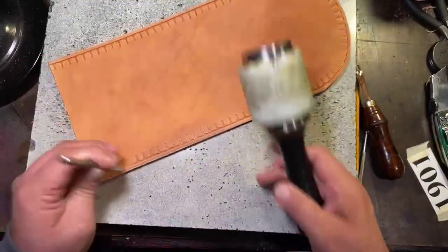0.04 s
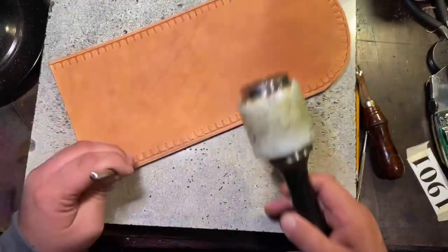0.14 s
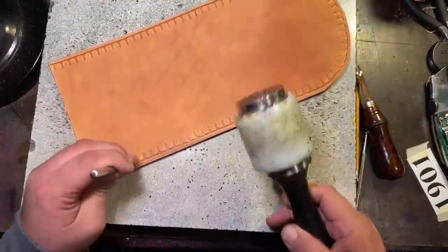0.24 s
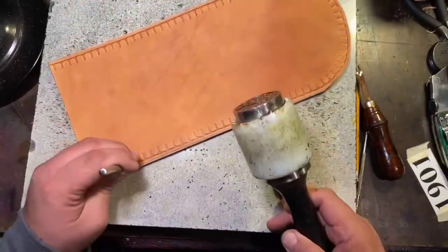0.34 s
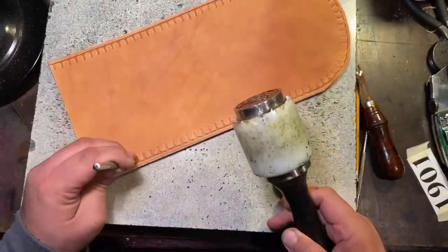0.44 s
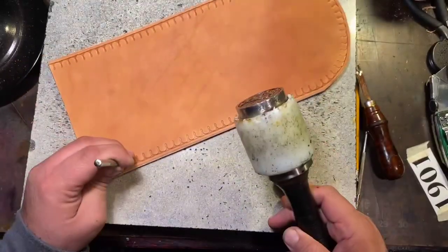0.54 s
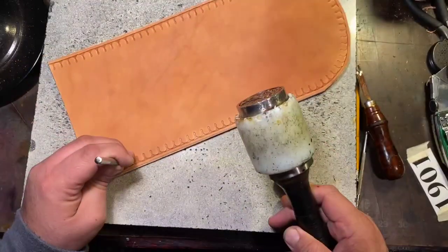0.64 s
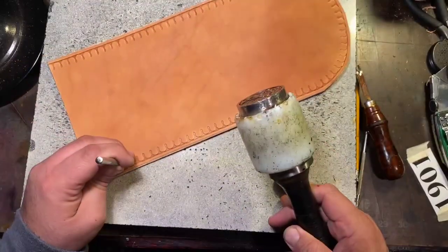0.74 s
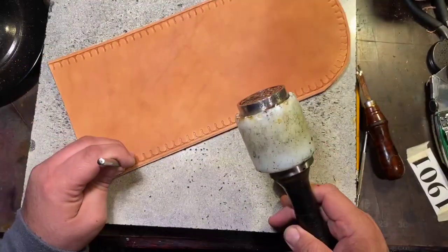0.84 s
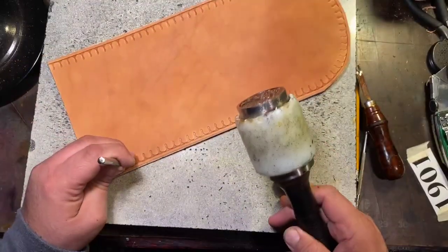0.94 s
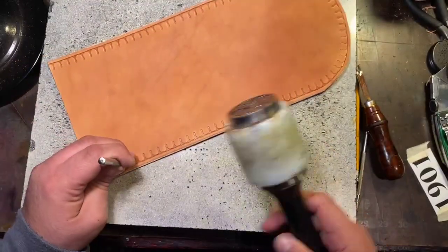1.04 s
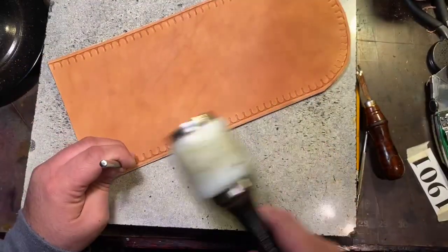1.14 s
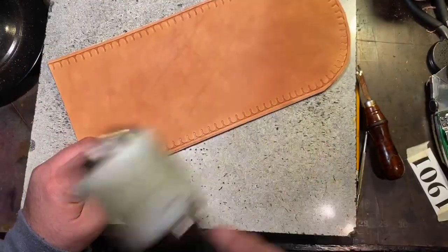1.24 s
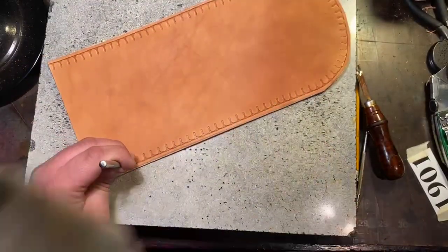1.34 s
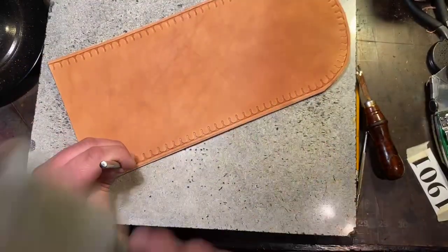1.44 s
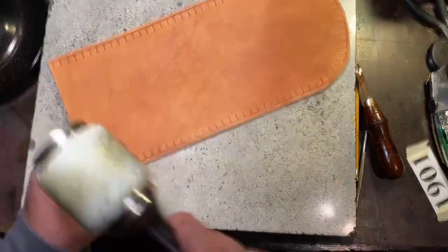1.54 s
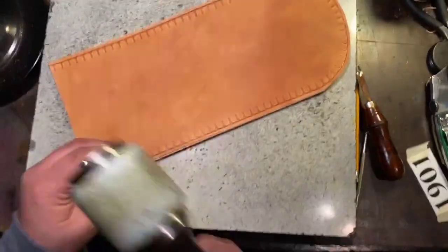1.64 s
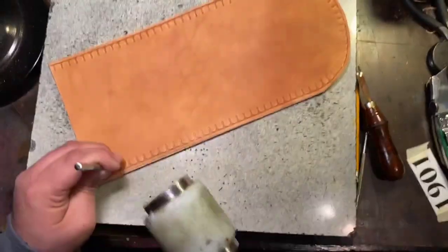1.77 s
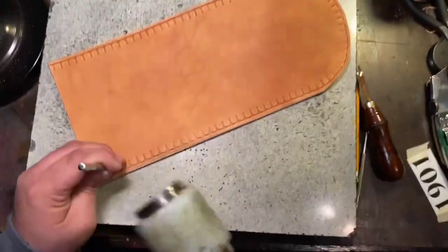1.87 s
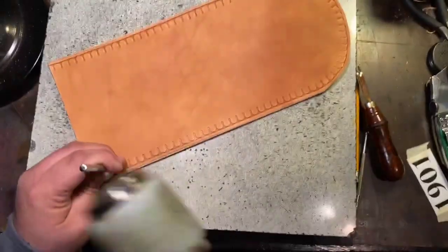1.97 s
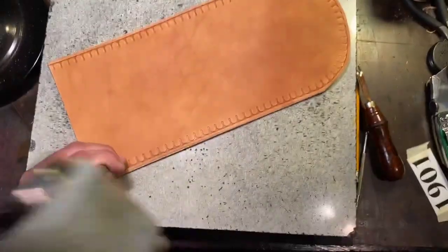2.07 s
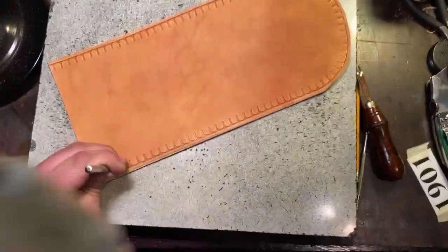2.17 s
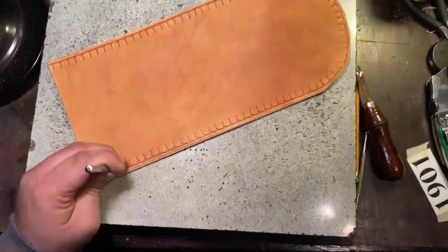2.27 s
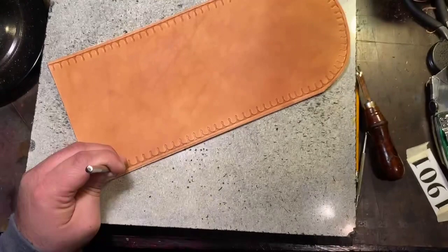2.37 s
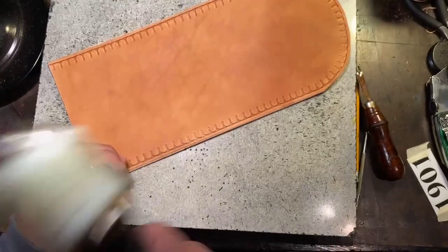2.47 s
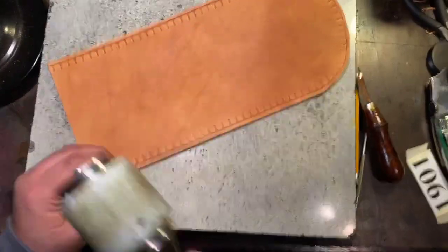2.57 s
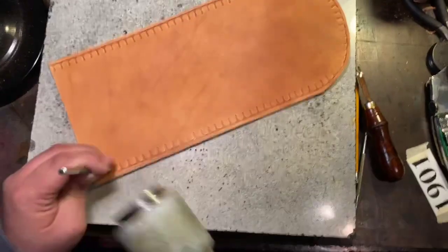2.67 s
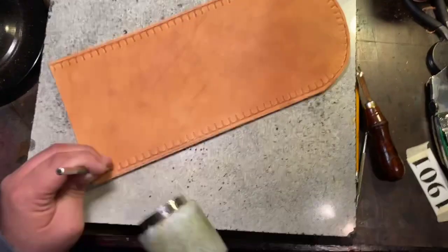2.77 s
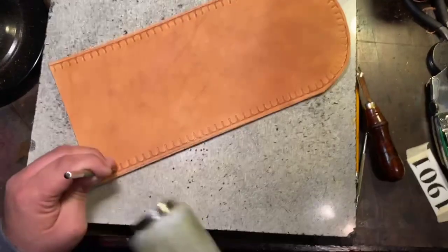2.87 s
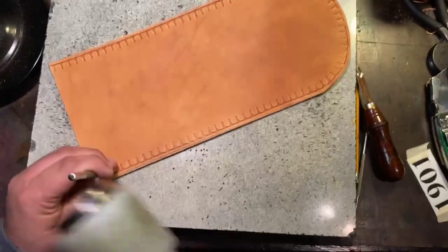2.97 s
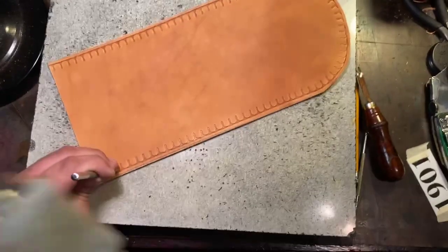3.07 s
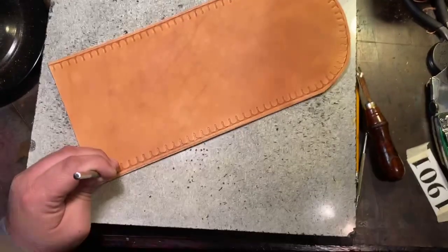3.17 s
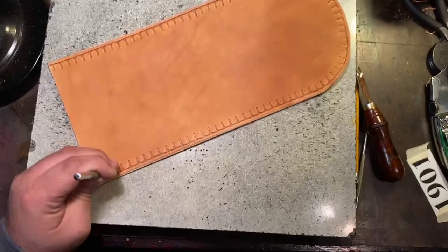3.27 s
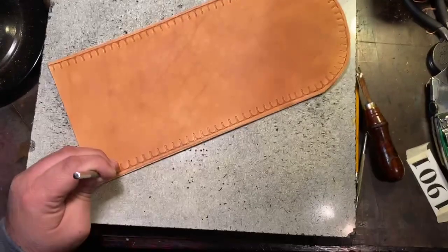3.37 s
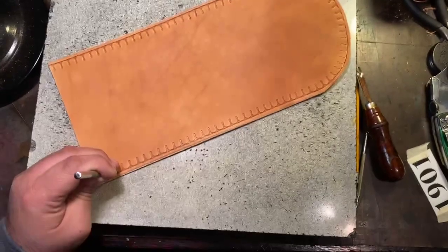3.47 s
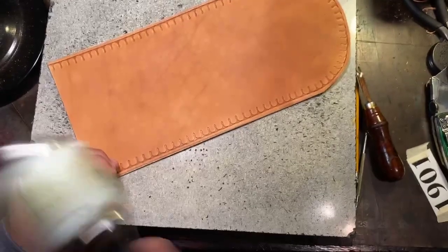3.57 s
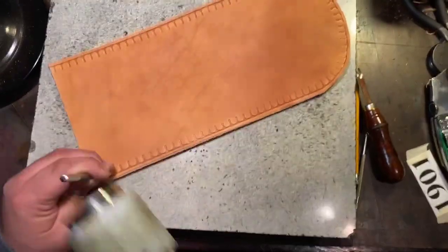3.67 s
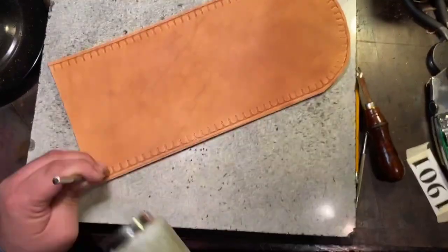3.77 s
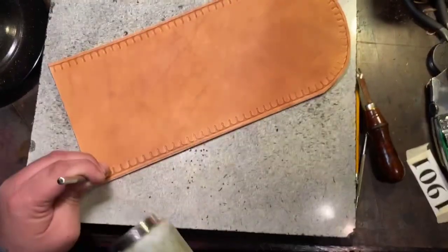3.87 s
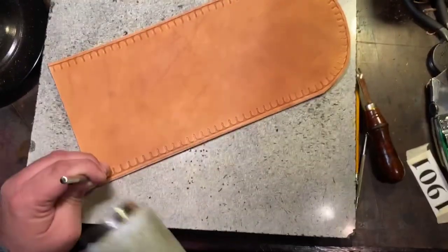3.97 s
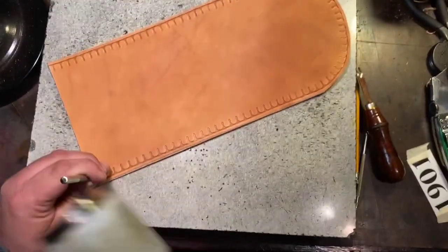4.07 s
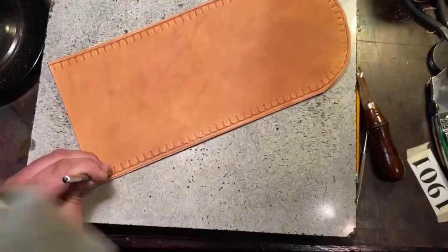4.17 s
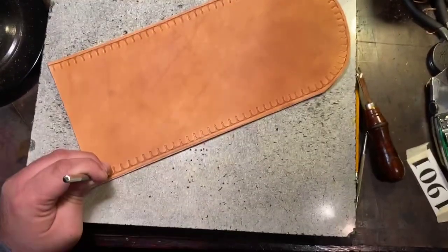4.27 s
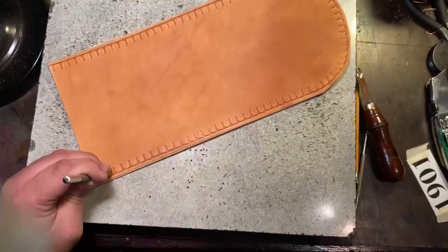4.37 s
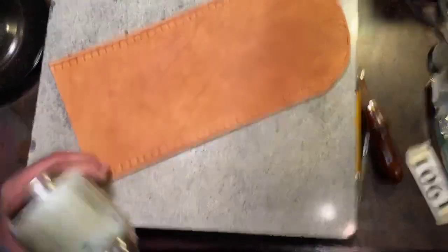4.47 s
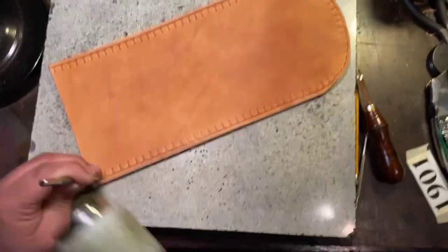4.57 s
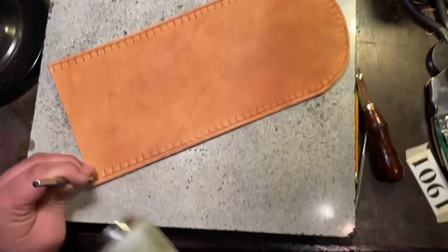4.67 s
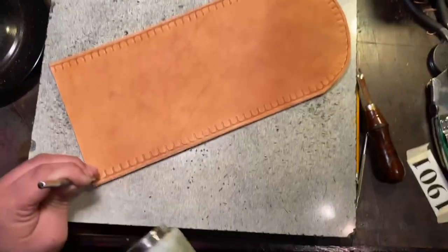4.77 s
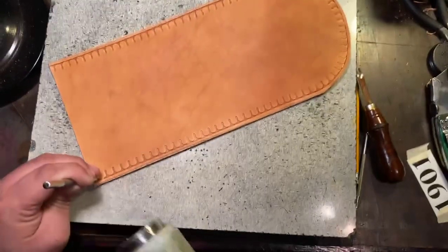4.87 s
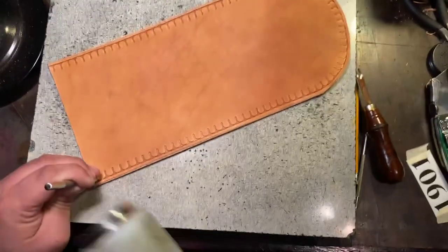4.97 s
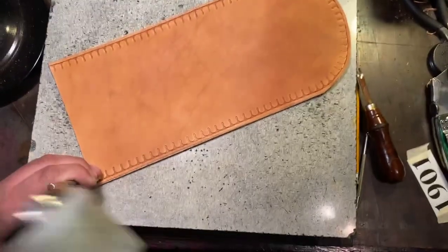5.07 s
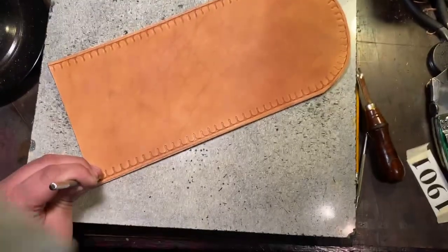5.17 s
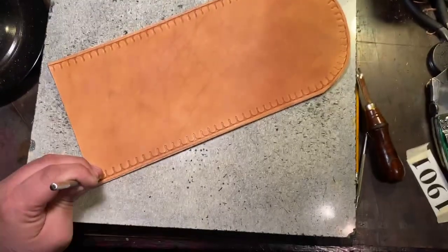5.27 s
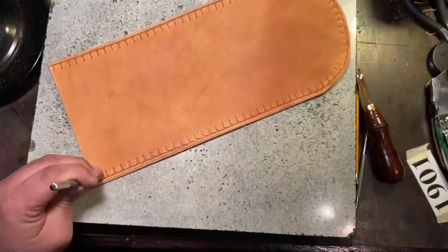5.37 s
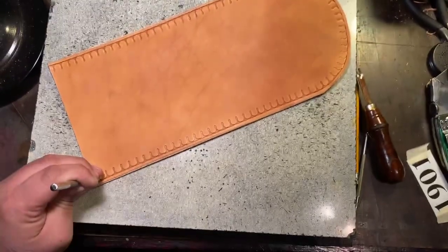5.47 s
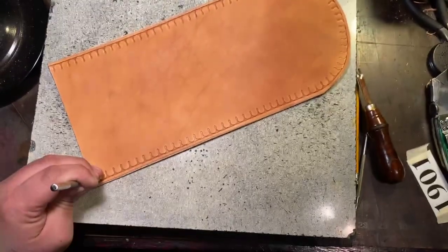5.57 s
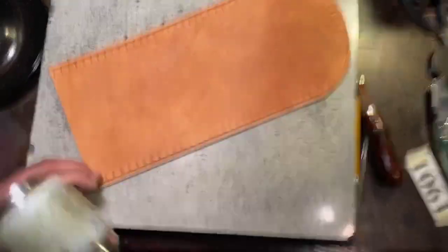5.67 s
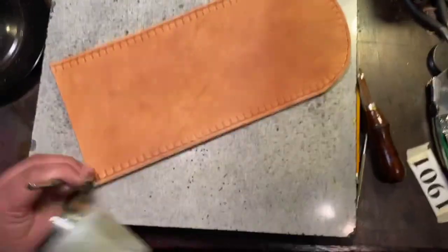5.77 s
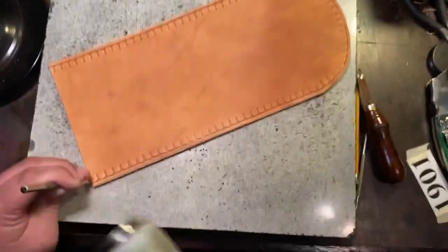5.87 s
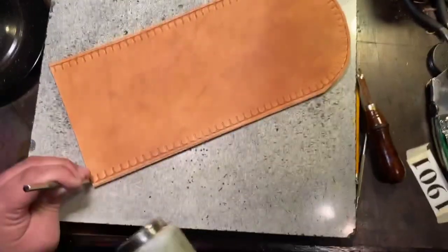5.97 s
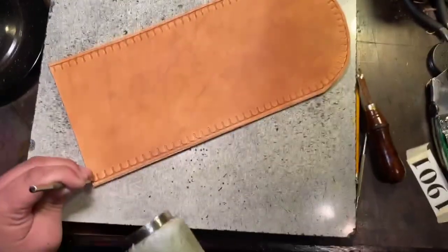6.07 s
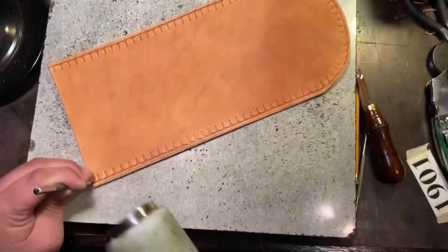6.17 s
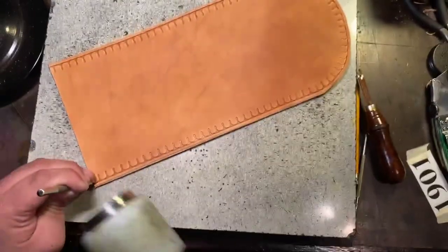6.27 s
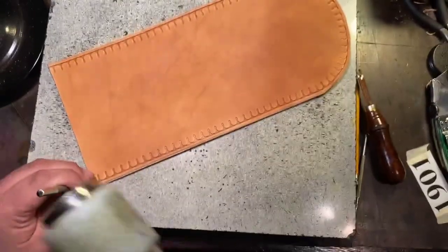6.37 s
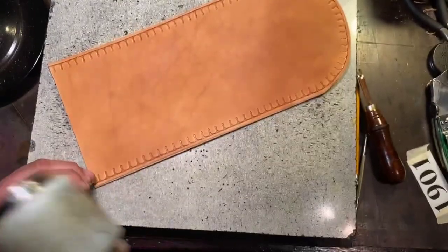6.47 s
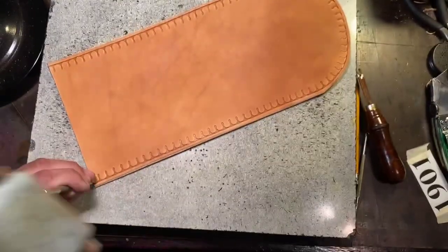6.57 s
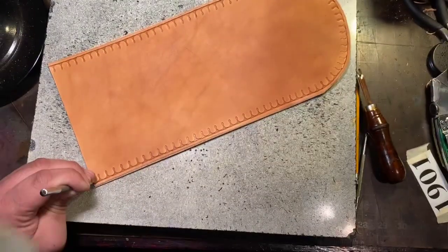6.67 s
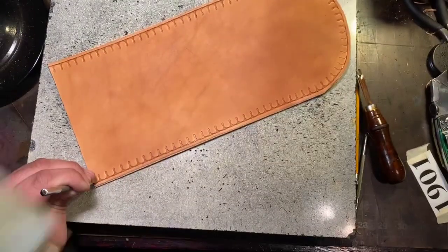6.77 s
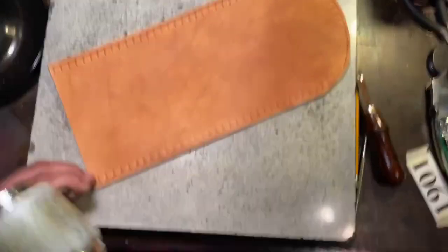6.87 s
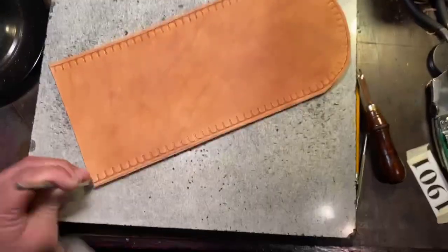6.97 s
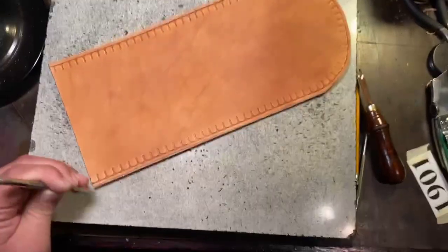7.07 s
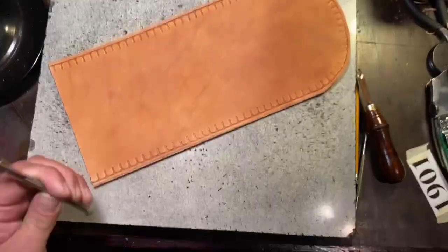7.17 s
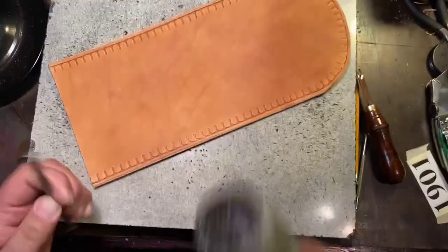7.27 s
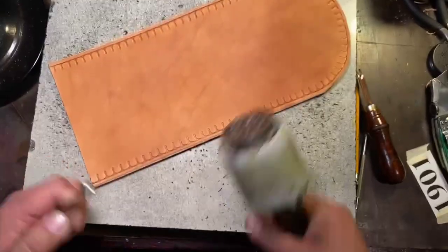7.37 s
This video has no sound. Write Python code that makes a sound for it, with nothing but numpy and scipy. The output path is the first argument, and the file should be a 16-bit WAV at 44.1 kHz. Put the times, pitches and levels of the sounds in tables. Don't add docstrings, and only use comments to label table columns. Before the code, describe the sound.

Leather stamping heard from just above a bench: light rustles and metallic scrapes, then six loud, dry cracks of plastic on steel over a stone slab. Each has a low wooden thud, quick ceiling echo, jangling tools and a rapidly dying room wash. Between blows come arm swishes, small creaks and a faint distant squeak, over steady soft hum.

```python
import sys
import numpy as np
from scipy import signal
from scipy.fft import rfft, irfft
from scipy.io import wavfile
from scipy.ndimage import uniform_filter1d, minimum_filter1d

SR = 44100
rng = np.random.default_rng(int(sys.argv[2]) if len(sys.argv) > 2 else 0)


def file_out(sig):
    cols = np.atleast_2d(sig).T
    lim = np.clip(cols, -1, 1)
    pcm = np.round(lim * 32767).astype(np.int16)
    wavfile.write(sys.argv[1], SR, pcm)


def natural_amplitude(level_db):
    exponent = np.asarray(level_db, float) / 20
    return 10 ** exponent


N = 327530
TIME = np.arange(N) / SR
RING_TIME = TIME[:SR]


def level(x, db):
    return x * natural_amplitude(db) / np.sqrt(np.mean(x ** 2))


def along(table, hz):
    points = np.array(table)
    return np.interp(np.log(hz), np.log(points[:, 0]), points[:, 1])


def band(x, hz, width):
    f = np.fft.rfftfreq(len(x), 1 / SR)
    return irfft(rfft(x) * np.exp(-((f - hz) / width) ** 2), len(x))


def noise_band(hz, width):
    return band(rng.standard_normal(N), hz, width)


def walk(rate):
    return level(noise_band(0, rate), 0)


def bump(s, length):
    return np.exp(-(2 * (TIME - s) / length) ** 2)


def fade(t60):
    return np.exp(-np.log(1000) * RING_TIME / t60)


def modes(table, rise_s):
    ring = sum(natural_amplitude(db) * np.sin(2 * np.pi * hz * RING_TIME) * fade(t60) for hz, db, t60 in table)
    return ring * (1 - np.exp(-RING_TIME / rise_s))


def late(x, s):
    place = np.arange(len(x))
    return np.interp(place - s * SR, place, x, left=0, right=0)


# (frequency [Hz], level per Hz [dB])
AIR = [(300, -6.5), (450, -8), (600, -12.5), (1300, -22), (3000, -28.5), (5900, -30.5), (16000, -38)]


def room_rumble():
    air = 0
    for hz in 300 * 2 ** np.arange(0, 6, .5):
        flicker_db = 1.2 * walk(4)
        air = air + natural_amplitude(along(AIR, hz) + flicker_db) * noise_band(hz, hz / 4)
    return level(air, -64.5)


# (frequency [Hz], width [Hz], level [dB])
HUM = [(63, 3.4, -57.5), (55, 12, -65), (90, 19, -70), (126, 10, -64.5), (150, 9.3, -65.5),
       (170, 7.1, -57.5), (221, 39, -64.5), (240, 4, -61.5), (353, 4.1, -73.5), (469, 4, -72.5)]


def machine_hum():
    return sum(level(noise_band(hz, width), db) for hz, width, db in HUM)


def camera_whine():
    period_s, start_s = .1, .046
    sweep = ((TIME - start_s) / period_s) % 1
    hz = 8700 + 338 * sweep
    return natural_amplitude(-84.5) * np.sin(2 * np.pi * np.cumsum(hz) / SR)


# (time [s], length [s], level [dB], tilt toward the top mode [dB])
SLIDES = [(0.112, 0.38, -72, 3), (1.36, 0.41, -77, -2), (3.283, .45, -73.5, 2.5), (4.28, 0.14, -73, 0.5),
          (4.8, 0.066, -81.5, 6), (5.26, 0.085, -77, 1), (5.44, .2, -77, 5), (5.968, .14, -78.5, 11.5),
          (6.69, 0.22, -72, 3.5), (7.265, 0.062, -87, 10), (7.372, .1, -81.5, 12)]
# (frequency [Hz], width [Hz], level [dB])
STAMP = [
    (4500, 6400, 1),
    (2360, 120, -1.5),
    (3230, 200, -7),
    (5940, 450, -5.5),
]


def stamp_slides(rustle):
    *low, top = (level(band(rustle, hz, width), db) for hz, width, db in STAMP)
    slide = 0
    for s, length, db, tilt_db in SLIDES:
        scrape = natural_amplitude(-tilt_db) * sum(low) + natural_amplitude(tilt_db) * top
        slide = slide + bump(s, length) * natural_amplitude(db) * scrape
    return slide


# (time [s], length [s], level [dB], centre frequency [Hz])
SWISHES = [
    (0.153, .5, -69.5, 1570),
    (.881, .11, -65.5, 1170),
    (1.33, .3, -73, 6905),
    (2.341, .13, -58.5, 1290),
    (3.27, .09, -74.5, 9050),
    (5.393, .12, -78, 6980),
    (6.526, .14, -64.5, 1810),
    (7.017, .16, -69.5, 6470),
]


def arm_swishes(rustle):
    return sum(bump(s, length) * level(band(rustle, hz, .8 * hz), db) for s, length, db, hz in SWISHES)


# (time [s], length [s], level [dB], frequency [Hz], width [Hz])
SQUEAKS = [
    (0.477, 0.12, -56.5, 364, 9.4),
    (1.61, 0.13, -53, 1000, 90),
    (1.6, 0.1, -56, 1400, 300),
    (1.62, 0.12, -53, 490, 80),
]


def bench_squeaks(rustle):
    return sum(bump(s, length) * level(band(rustle, hz, width), db) for s, length, db, hz, width in SQUEAKS)


# (time [s], length [s], level [dB], frequency [Hz])
FAR_SQUEAK = [(4.815, .08, -78, 3000), (4.9, .12, -79, 2910), (4.87, .14, -76, 2190),
              (4.95, .08, -68, 2180), (5.04, .07, -80, 2200), (4.93, .1, -68, 813), (5.53, .07, -75, 3550)]


def far_squeak():
    waver = .002 * np.cumsum(walk(25))
    squeak = 0
    for s, length, db, hz in FAR_SQUEAK:
        tone = np.sin(2 * np.pi * hz * TIME + waver * hz / 3000)
        squeak = squeak + bump(s, length) * level(tone, db)
    return squeak


def hands():
    rustle = rng.standard_normal(N) * natural_amplitude(1.5 * walk(40))
    return stamp_slides(rustle) + arm_swishes(rustle) + bench_squeaks(rustle) + far_squeak()


def smear():
    out = np.zeros(N)
    for (s, early), (_, knock_db, _, _) in zip(BLOW_S, BLOWS):
        weak_db = 1.1 * min(knock_db, 0)
        near_db, fore_db, hz = -18.5 + weak_db, -36.5 + weak_db / 2, 3950 - 55 * weak_db
        noise = rng.standard_normal(N)
        narrow = level(band(noise, hz, 380), 0) + level(band(noise, 6000, 1500), -9)
        near = natural_amplitude(near_db) * np.clip((TIME - s + early) / .001, 0, 1) * narrow
        steps = np.clip((TIME - s + .0115) / .001, 0, 1)
        steps = steps + .2 * np.clip((TIME - s + .019) / .003, 0, 1)
        fore = natural_amplitude(fore_db) * steps * (narrow + level(band(noise, 800, 600), -2.5))
        out += (near + fore) * (TIME < s + .001)
    return out


# (frequency [Hz], level [dB], decay by 60 dB [s])
FACE = [(1450, -2, .012), (1700, 2, .014), (2150, -6, .012), (2800, -1, .013), (4500, -6, .01),
        (5400, -10, .01), (7000, -14, .01), (9000, -22, .01), (12500, -26, .01)]
# (frequency [Hz], width [Hz], level [dB], decay by 60 dB [s])
SNAP = [
    (1910, 1600, -12.5, 0.015),
    (9000, 4500, -27, 0.013),
]
# (delay [s], level [dB])
ECHOES = [
    (.0082, -5),
    (.0135, -14),
    (.0225, -14),
]


def maul_crack(crack_db, crack_hz):
    face = [(hz * (1 + .03 * rng.standard_normal()), db + 1.5 * rng.standard_normal(), t60)
            for hz, db, t60 in FACE]
    crack = natural_amplitude(crack_db - 6) * modes(face + [(crack_hz, 2, .014)], .0002)
    grit = rng.standard_normal(SR)
    snap = sum(level(band(grit, hz, width), db) * fade(t60) for hz, width, db, t60 in SNAP)
    crack = crack + natural_amplitude(crack_db) * snap
    return crack + sum(natural_amplitude(db) * late(crack, delay) for delay, db in ECHOES)


# (frequency [Hz], level [dB], decay by 60 dB [s], width [Hz])
TOOLS = [(2440, -30.5, .3, 110), (4000, -37.5, .3, 200), (6270, -37.5, .25, 90), (12600, -47, .22, 200),
         (15300, -49, .2, 180), (14200, -49, .18, 300)]
# (frequency [Hz], level [dB], decay by 60 dB [s])
SINGER = [
    (2383, -59, 1.),
    (2394, -64, .7),
]


def tools_ring(knock_db):
    noise = rng.standard_normal(SR)
    jangle = 0
    for hz, db, t60, width in TOOLS:
        jangle = jangle + level(band(noise, hz, width), db + 2 * rng.standard_normal()) * fade(t60)
    jangle = jangle * (1 - fade(0.02))
    return natural_amplitude(knock_db / 2) * jangle + natural_amplitude(knock_db) * modes(SINGER, .01)


# (frequency [Hz], level per Hz [dB])
TAIL = [(62, -11.5), (140, -10.5), (300, -7), (600, -8), (1300, -14.5), (3200, -21), (7000, -27),
        (13000, -39.5)]
# (frequency [Hz], decay by 60 dB [s])
TAIL_T60 = [(62, 1), (150, 0.37), (500, 0.27), (1500, 0.27), (4000, 0.22), (9000, .21), (13000, 0.11),
            (15500, 0.1)]


def workshop_tail(noise, knock_db):
    share = [(150, 0.13), (400, 0.79), (2300, 0.34), (3500, 0.14)]
    far_gain, far_stretch = natural_amplitude(-20), 1.6
    tail = 0
    for hz in 55 * 2 ** np.arange(0, 8.3, 1 / 4):
        a, b = rng.standard_normal(size=2) * min(hz / 1000, 1)
        t60 = along(TAIL_T60, hz) * (1 + .05 * b)
        decay = fade(t60) + far_gain * fade(far_stretch * t60)
        rise = 1 - np.exp(-RING_TIME / (0.0022 + 3.0 / hz))
        db = along(TAIL, hz) + 5.5 + knock_db * along(share, hz) + 1.6 * a
        tail = tail + natural_amplitude(db) * band(noise, hz, hz / 8) * decay * rise
    tail = tail * (1 - 0.3 * np.exp(-RING_TIME / 0.064))
    lumps = natural_amplitude(1.3 * walk(150)[:SR])
    return lumps * tail


# (frequency [Hz], level [dB], decay by 60 dB [s])
SLAB = [(306, -18, .28), (338, -11, .1), (423, -20, .25), (493, -14, .19), (590, -5, .04), (684, -19, .16),
        (736, -19, .19), (838, -7, .04), (890, -24, .25), (1051, -26, .19)]


def slab_knock():
    return late(modes(SLAB, .001), .0022)


# (frequency [Hz], level [dB], decay by 60 dB [s])
BENCH = [(64, -20, .28), (127, 0, .09), (138, -11, .27), (154, -18, .23)]
# (frequency [Hz], level [dB], decay by 60 dB [s])
BENCH_OPPOSED = [(99, -6, .08), (189, -14, .16), (222, 0, .04)]


def bench_thud():
    return late(modes(BENCH, .009) - modes(BENCH_OPPOSED, .009), .0054)


# (frequency ratio [1], level [dB], decay by 60 dB [s])
RING = [(.84, -6.5, 0.16), (.925, -6, 0.077), (.98, -1, 0.14), (1.012, -2.5, 0.14), (1.06, -3.5, .16),
        (1.12, -2, 0.11)]


def maul_ring(ring_hz, knock_db):
    shorter = natural_amplitude(.4 * min(knock_db, 0))
    cluster = [(ring_hz * ratio, db - 21 + 2 * rng.standard_normal(), t60 * shorter)
               for ratio, db, t60 in RING]
    return late(modes(cluster, .003), .017)


# (time [s], lead of the smear before the crack [s])
BLOW_S = [
    (1.4435, .002),
    (2.4354, .002),
    (3.4904, .0065),
    (4.3748, .003),
    (5.5816, .0065),
    (6.7558, .006),
]
# (crack level [dB], slab knock level [dB], stamp crack frequency [Hz], maul ring frequency [Hz])
BLOWS = [
    (0.5, 2.5, 3920, 2430),
    (-1, 0, 3950, 2300),
    (-1.5, 0, 3800, 2350),
    (-0.5, 1.5, 3850, 2200),
    (-4, 1.5, 4260, 2310),
    (0, -9.5, 3150, 3150),
]


def blows():
    out = np.zeros(N + SR)
    same = rng.standard_normal(SR)
    knock, thud = slab_knock(), bench_thud()
    for (s, _), (crack_db, knock_db, crack_hz, ring_hz) in zip(BLOW_S, BLOWS):
        thud_db = 0.88 + .7 * crack_db + .3 * knock_db
        blow = maul_crack(crack_db, crack_hz) + tools_ring(knock_db)
        blow = blow + workshop_tail(.7 * same + .7 * rng.standard_normal(SR), knock_db)
        blow = blow + natural_amplitude(knock_db) * knock + natural_amplitude(thud_db) * thud
        blow = blow + maul_ring(ring_hz, knock_db)
        start = int(s * SR)
        out[start:start + SR] += blow
    return out[:N]


def scene():
    background = room_rumble() + machine_hum() + camera_whine()
    return (background + hands() + blows())[None]


def top_cut(x):
    return signal.sosfilt(signal.butter(12, 16640, fs=SR, output="sos"), x)


# (lead [s], level [dB])
LEADS = [
    (.0105, -26),
    (.021, -40),
]


def record(dry):
    peak = -minimum_filter1d(-np.abs(dry[0]), size=441)
    gain = uniform_filter1d(np.minimum(1, .94 / peak), size=221)
    held = dry[0] * gain
    bright = band(held, 4500, 2500)
    held = held + sum(natural_amplitude(db) * late(bright, -lead) for lead, db in LEADS) + smear()
    held = signal.sosfilt(signal.ellip(8, .2, 60, 15900, fs=SR, output="sos"), held)
    return top_cut(held[None])


dry = scene()
out = record(dry)
file_out(out)
```